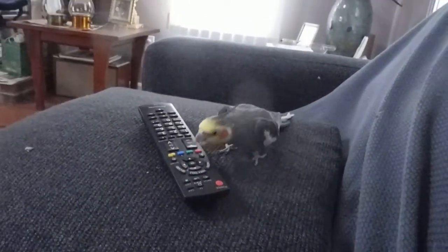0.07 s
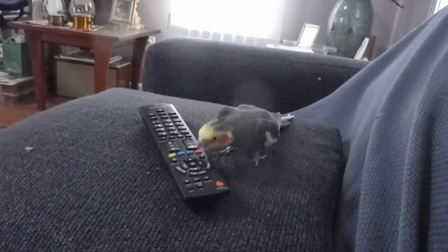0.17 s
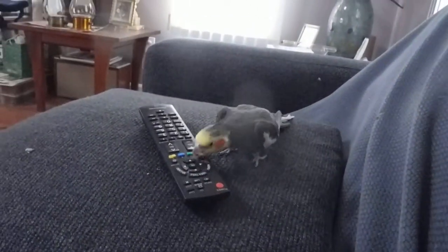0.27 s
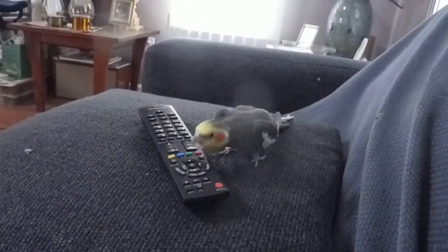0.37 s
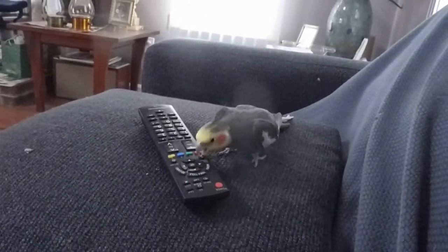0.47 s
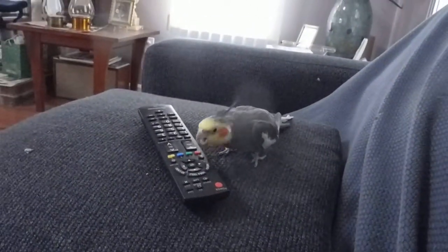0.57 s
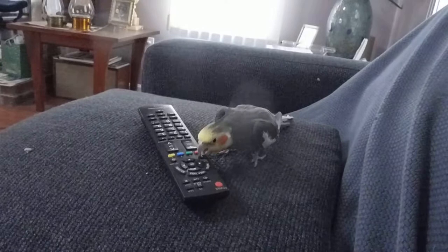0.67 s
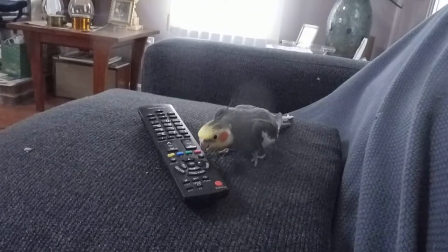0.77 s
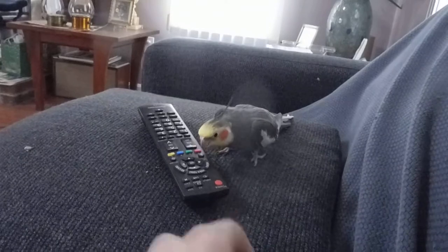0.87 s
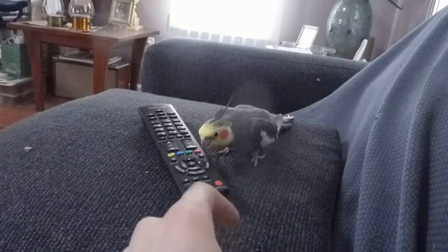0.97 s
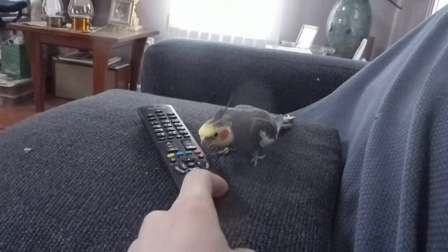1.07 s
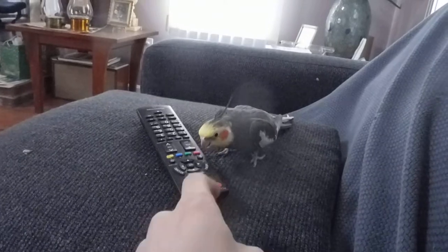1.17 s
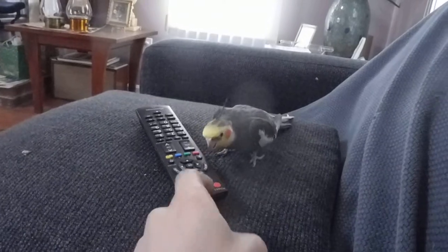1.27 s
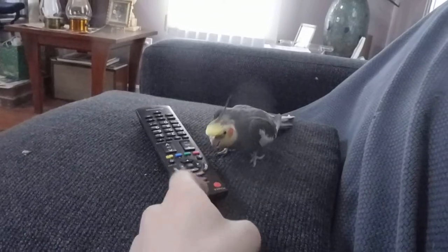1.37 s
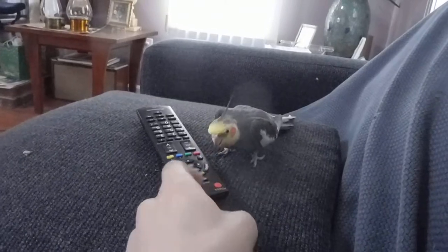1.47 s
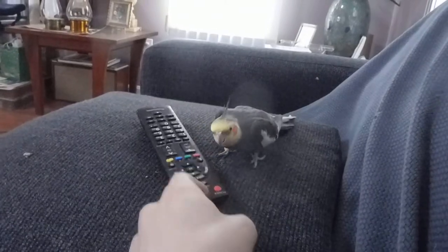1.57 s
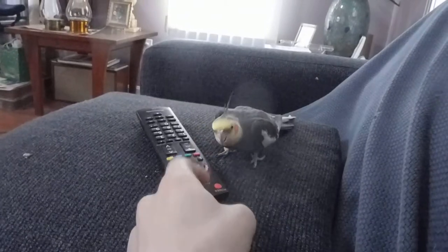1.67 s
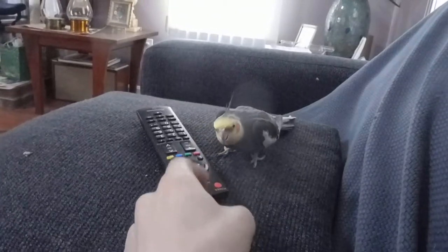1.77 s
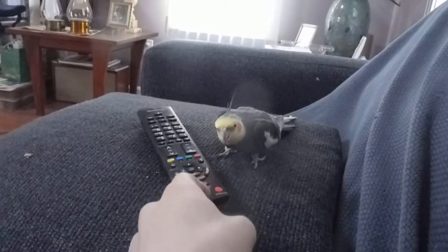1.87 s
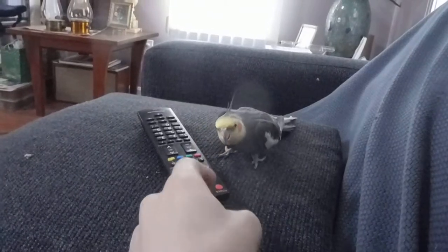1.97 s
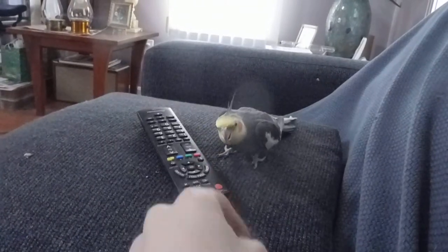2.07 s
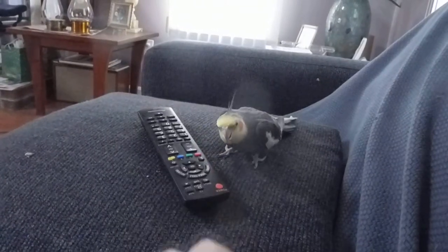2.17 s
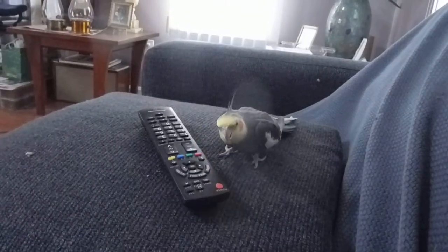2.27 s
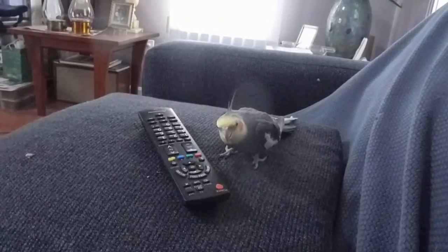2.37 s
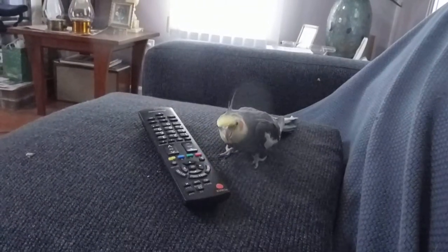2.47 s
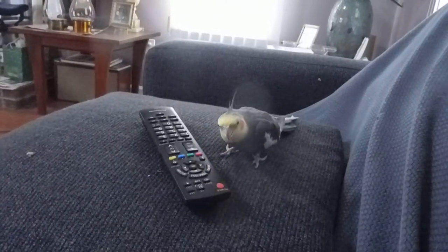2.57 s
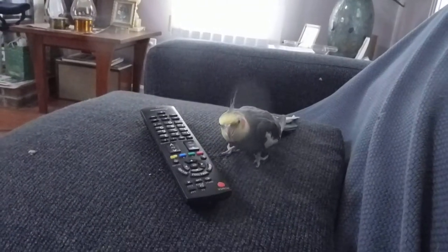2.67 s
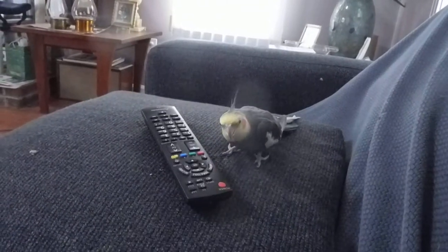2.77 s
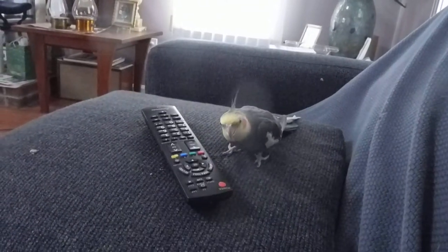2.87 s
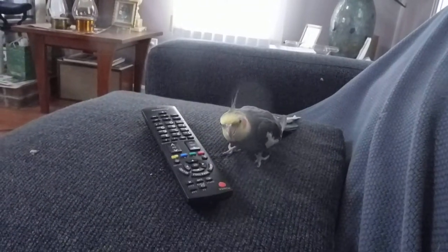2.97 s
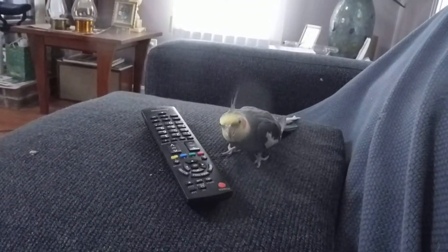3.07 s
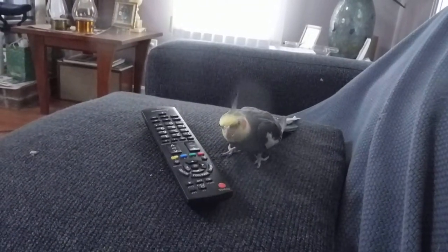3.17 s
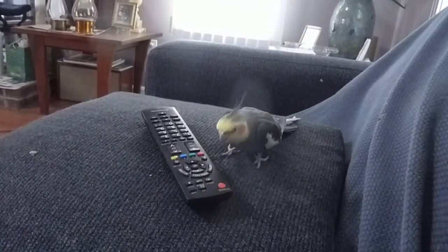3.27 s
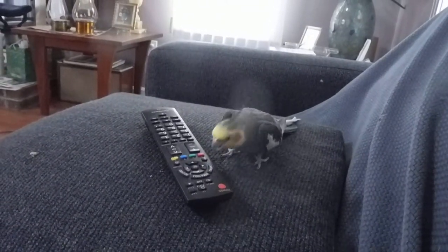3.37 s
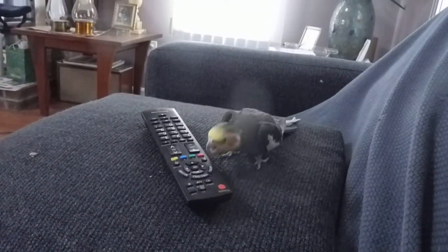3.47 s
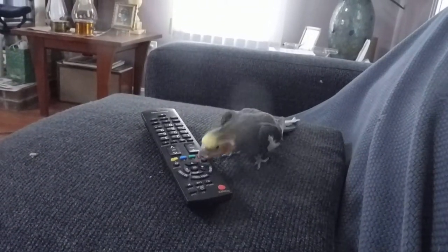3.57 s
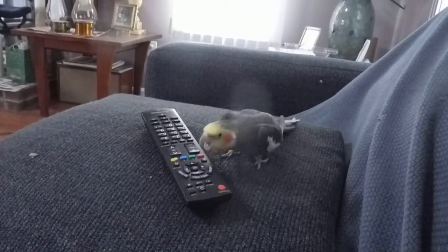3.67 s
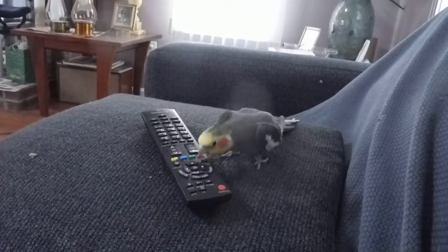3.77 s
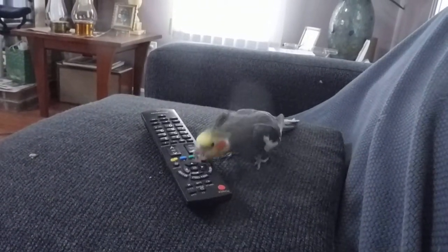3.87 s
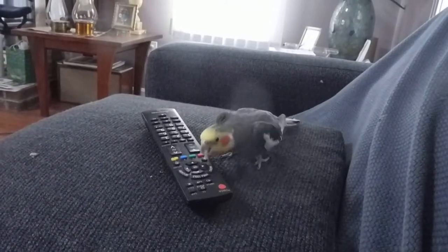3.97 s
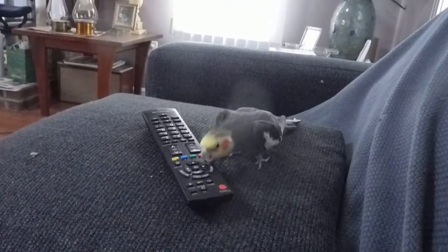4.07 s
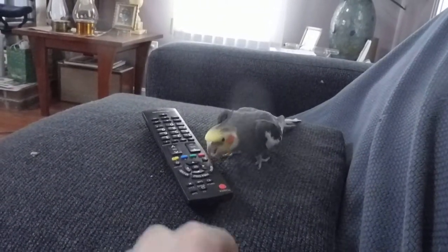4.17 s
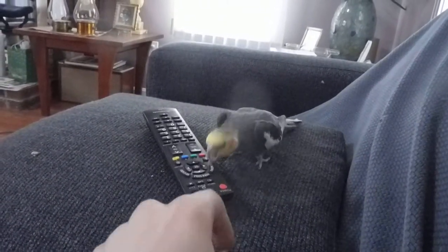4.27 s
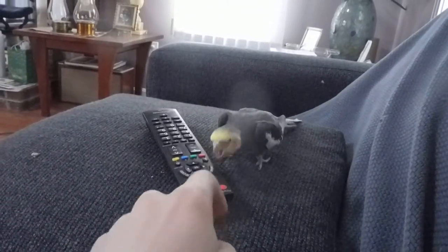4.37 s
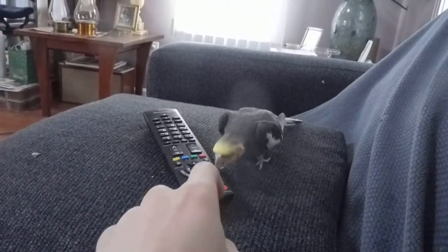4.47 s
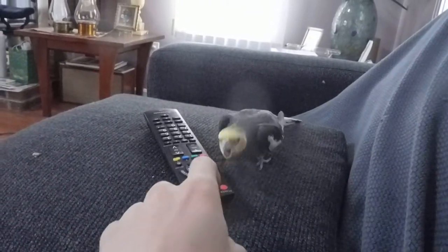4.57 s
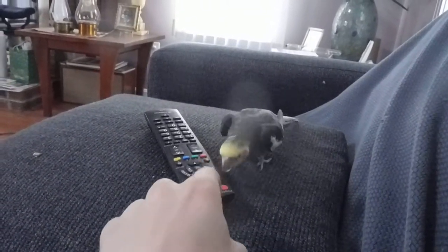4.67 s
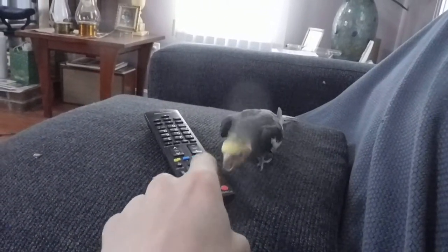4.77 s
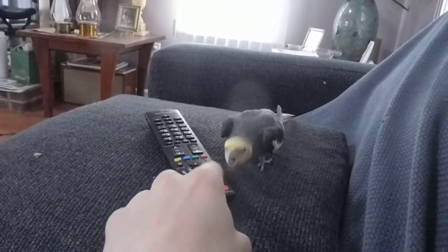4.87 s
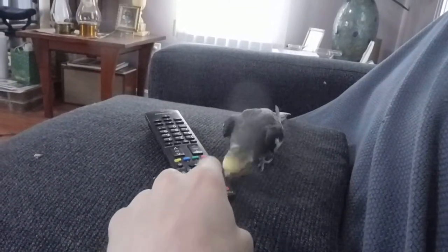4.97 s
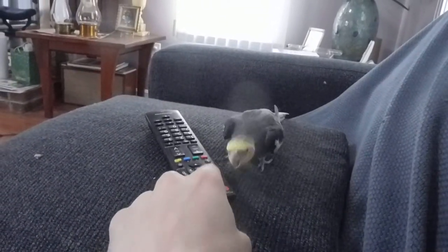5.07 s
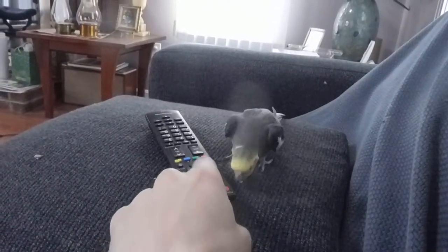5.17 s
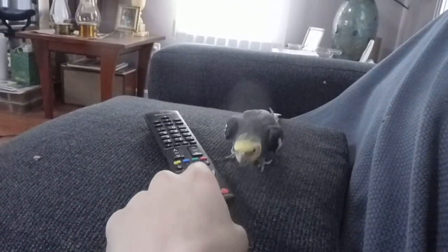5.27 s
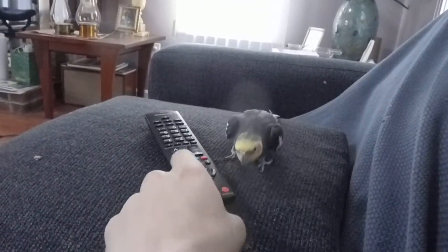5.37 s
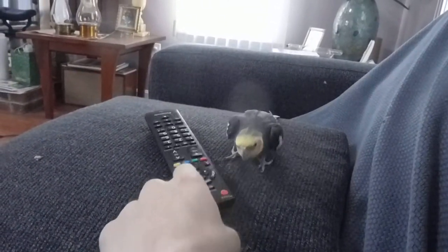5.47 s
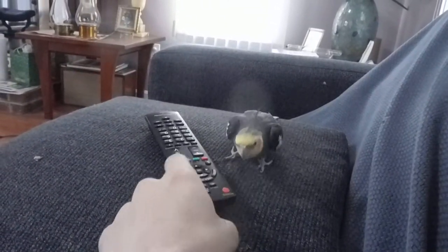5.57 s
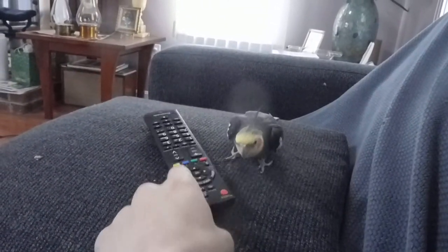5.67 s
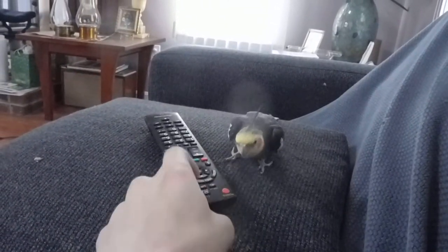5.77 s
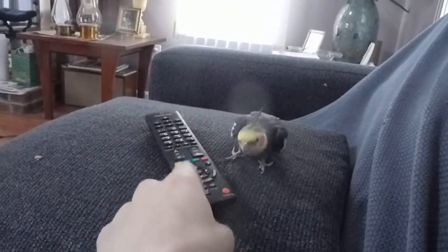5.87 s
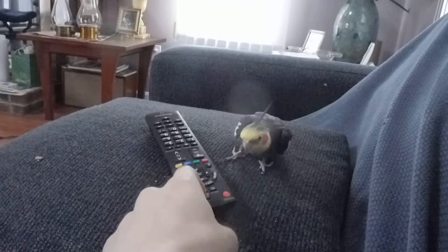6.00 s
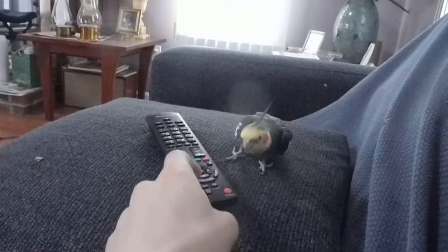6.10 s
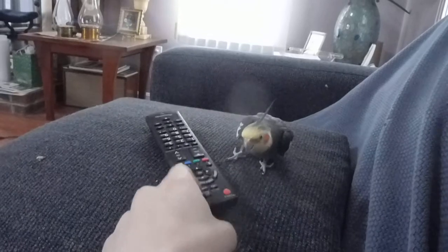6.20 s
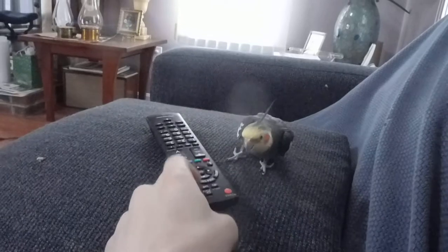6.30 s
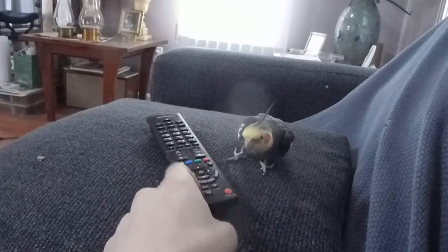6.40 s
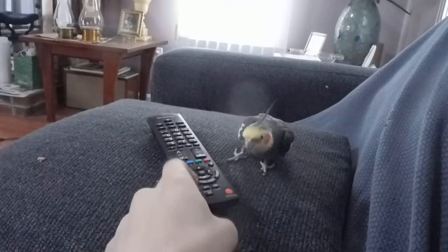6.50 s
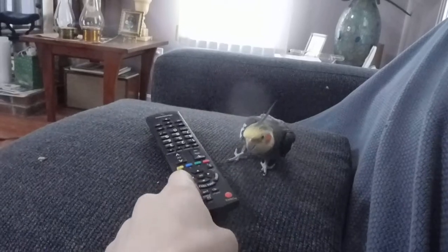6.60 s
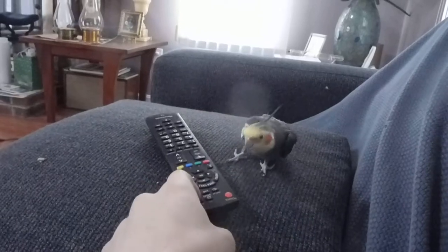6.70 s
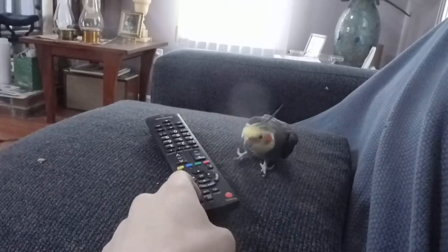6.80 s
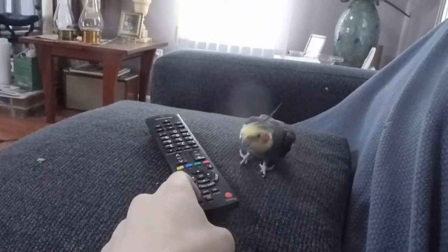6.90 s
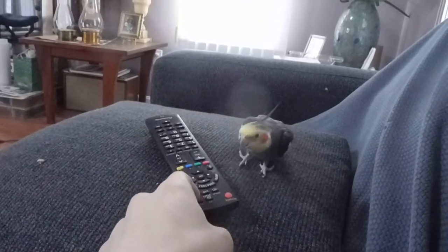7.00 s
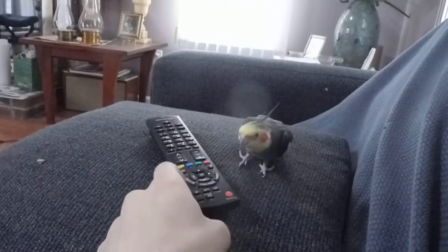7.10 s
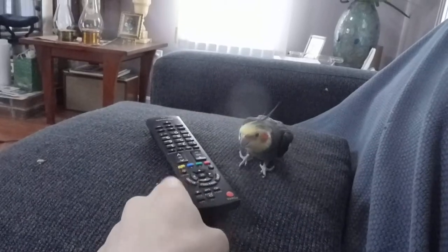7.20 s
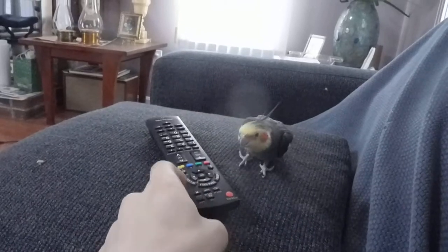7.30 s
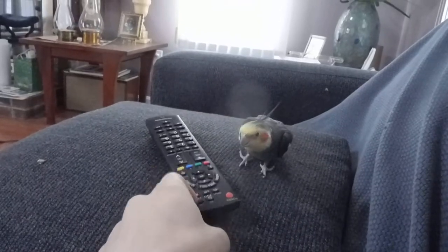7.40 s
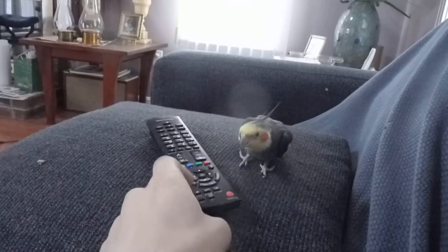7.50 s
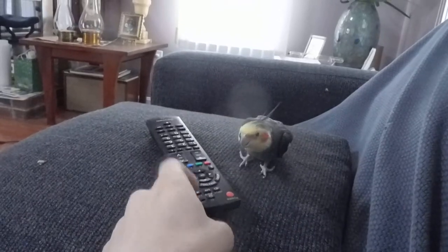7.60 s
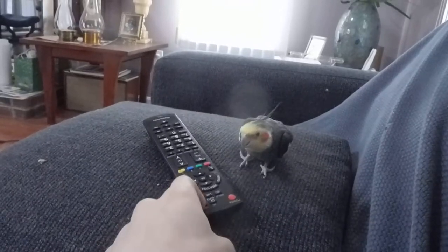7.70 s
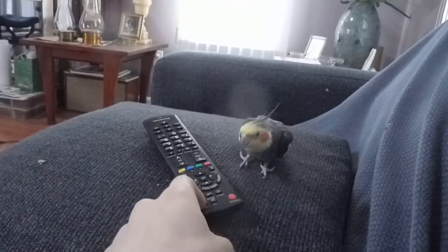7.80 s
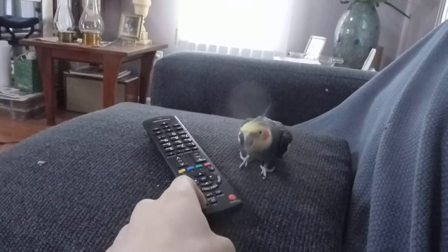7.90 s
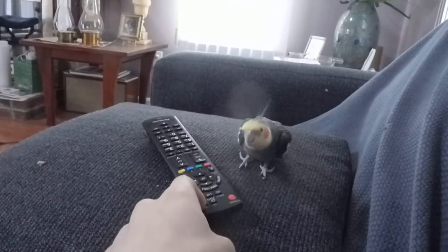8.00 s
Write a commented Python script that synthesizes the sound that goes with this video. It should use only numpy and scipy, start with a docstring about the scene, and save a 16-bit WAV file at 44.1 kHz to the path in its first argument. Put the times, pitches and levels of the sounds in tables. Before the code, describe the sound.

Tiny crisp beak clicks on plastic come in irregular clusters, answered by evenly spaced finger taps that rattle a hollow remote case. Midway there is a dull little thup and a run of sharp hard taps, fading in strength. More rattly button presses follow, then one brief bird squeak that breaks into a rasp. Close microphone, faint diffuse room tail, constant soft hiss over low rumble and hum.

```python
"""A quiet living room: steady hiss over a low rumble and an appliance's wavering hum, all the way through.
A pet bird's beak snaps at a plastic remote control, ringing modes and crackle, with a few noisy scrapes;
then a finger taps the buttons and rattles the hollow case. Midway come a soft downward "thup" and sharp taps
on hard plastic, then more button taps, and at the end one squeak: a falling whistle that breaks and rasps.
The room answers each of these faintly with a diffuse noise tail."""
import sys
import numpy as np
from scipy import signal
from scipy.fft import rfft, irfft
from scipy.io import wavfile
from scipy.ndimage import uniform_filter1d

SR = 44100
rng = np.random.default_rng(int(sys.argv[2]) if len(sys.argv) > 2 else 0)


def generate_wav(sig):
    """Save sig (samples, or channels by samples) to the path in sys.argv[1] as 16-bit PCM at SR."""
    pcm = np.round(np.clip(np.atleast_2d(sig).T, -1, 1) * 32767).astype(np.int16)
    wavfile.write(sys.argv[1], SR, pcm)


N = 354784
HIT_SIZE = 4096  # samples in one hit or scrape


def undb(db):
    """Decibels to gain."""
    return 10 ** (np.asarray(db) / 20)


def unit(x):
    """Scale to rms 1."""
    return x / np.sqrt(np.mean(x ** 2))


def read(points, hz):
    """Read a curve of (f/Hz, level/dB) points on a log-frequency axis."""
    at, db = np.transpose(points)
    return np.interp(np.log(np.maximum(hz, 1)), np.log(at), db)


def colour(x, points, share=1):
    """Minimum-phase EQ with the gain of (f/Hz, level/dB) points; share scales the dB."""
    size = x.shape[-1]
    gain_db = read(points, np.fft.rfftfreq(size, 1 / SR))
    cepstrum = irfft(share * np.log(undb(gain_db)), size)
    # fold the cepstrum forward in time, which makes the filter causal
    cepstrum[1:size // 2] *= 2
    cepstrum[size // 2 + 1:] = 0
    return irfft(rfft(x) * np.exp(rfft(cepstrum)), size)


def fade(t, t60):
    """Exponential decay from t = 0, falling 60 dB in t60 seconds."""
    return (t >= 0) * np.exp(-np.log(1000) * np.maximum(t, 0) / t60)


def swell(t, length, attack_s, release_s):
    """Rise, hold and die away within a given length."""
    rise = np.sqrt(np.clip(t / attack_s, 0, 1))
    return rise * np.clip((length - t) / release_s, 0, 1)


def add(track, s, sound):
    """Mix a sound in at a given time."""
    start = int(s * SR)
    track[start:start + len(sound)] += sound[:N - start]


# colour of the hiss and rumble, relative: f/Hz, level/dB
AIR_COLOUR = [(12, -46), (20, -6), (93, -1), (119, -6), (145, -8), (227, -10), (496, -11.5), (754, -11),
              (1110, -13.5), (1210, -13), (1320, -14), (2430, -16.5), (7230, -25), (14100, -26.5),
              (15800, -28)]
# stereo width, side relative to mid: f/Hz, level/dB
AIR_WIDTH = [(60, -13), (110, -8.5), (200, -4), (380, -2.5), (700, -2), (1290, -0.5), (2380, -0.5),
             (4400, 0.5), (8120, -0.5), (15000, 1)]
# lines of the appliance hum: f/Hz, level/dB
HUM_LINES = [(118.4, -67.5), (236.9, -78), (1184, -73.5), (13668, -88)]
AIR_DB = -55  # rms of the mid signal


def background(waver_hz=0.79):
    """Wide coloured noise makes hiss over rumble; slowly wandering sines, equal on both sides, make the hum."""
    mid, side = colour(rng.standard_normal((2, N)), AIR_COLOUR)
    gain = undb(AIR_DB) / np.std(mid)
    side = colour(side, AIR_WIDTH)
    hum = 0
    for hz, db in HUM_LINES:
        drift = waver_hz * unit(uniform_filter1d(rng.standard_normal(N), size=4000))
        phase = 2 * np.pi * np.cumsum(hz + drift) / SR
        hum = hum + np.sqrt(2) * undb(db) * np.sin(phase)
    return gain * np.array([mid + side, mid - side]) + hum


# edges of the five registers whose levels shape a hit: f/Hz
REGISTER_EDGES = [150, 700, 1250, 2500, 6500, 16000]
# colour of the fine crackle in every contact: f/Hz, level/dB
GRIT_COLOUR = [(200, -27), (600, -2), (1300, -5.5), (3500, 7.5), (6500, 5.5), (11000, 0.5), (15500, -8)]
# a small body radiates little bass and has a gap above its bending modes: f/Hz, level/dB
BODY_RADIATION = [(80, -20), (170, -6), (230, 1), (520, 0), (640, -8), (900, 0)]


def strike(contacts, modes, register_db, grit_db, grit_t60, scatter):
    """Contacts (t/ms, level/dB) ring decaying modes and crackle; the spot hit sets each register's strength."""
    hz, db, t60 = np.transpose(modes)[:, :, None]
    hz = hz * (1 + scatter * rng.standard_normal(hz.shape))
    # neighbouring bending modes swing against each other
    facing = np.where(hz < 700, (-1) ** np.arange(len(hz))[:, None], 1)
    sound = 0
    for ms, contact_db in contacts:
        t = np.arange(HIT_SIZE) / SR - ms / 1000
        drive = facing
        if ms:
            # a later contact is too light to bend the whole body; short waves meet it with either sign
            drive = np.where(hz > 2500, rng.choice([-1, 1], hz.shape), hz > 700)
        partials = drive * undb(db) * fade(t, t60) * np.sin(2 * np.pi * hz * t)
        ring = partials.sum(0)
        crackle = fade(t, grit_t60) * rng.standard_normal(HIT_SIZE)
        grit = undb(grit_db) * colour(crackle, GRIT_COLOUR)
        sound = sound + undb(contact_db) * (ring + grit)
    sound = colour(sound, BODY_RADIATION)
    # tilt the sound in four passes towards each register's share of the blow
    edges = np.array(REGISTER_EDGES)
    centres = np.sqrt(edges[1:] * edges[:-1])
    for _ in range(4):
        power = np.add.reduceat(abs(rfft(sound)) ** 2, edges * HIT_SIZE // SR)[:-1]
        now_db = 10 * np.log10(2 * power / HIT_SIZE / (.01 * SR))  # energy spread over 10 ms
        sound = colour(sound, np.column_stack([centres, register_db - now_db]))
    return sound


def all_round(hit):
    """What a hit radiates into the room: summed over all directions, its peaks and notches even out."""
    power = abs(rfft(hit)) ** 2
    hz = np.geomspace(60, 18000, num=200)
    smooth = uniform_filter1d(np.interp(hz, np.fft.rfftfreq(HIT_SIZE, 1 / SR), power), size=13)
    smooth_db = 10 * np.log10(np.maximum(smooth, 1e-12))
    return colour(signal.unit_impulse(HIT_SIZE), np.column_stack([hz, smooth_db]))


def double_clicks(clicks, modes, tone, grit_db, grit_t60, room_db, room_slope):
    """A hard tip hits and catches again a moment later; returns the direct sound and the room send."""
    direct, sent = np.zeros((2, N))
    tone_db, slope = np.transpose(tone)
    for s, db, contact_db, catch_ms, catch_db in clicks:
        register_db = db + tone_db + slope * contact_db
        contacts = [(0, 0), (catch_ms, catch_db)]
        click = strike(contacts, modes, register_db, grit_db, grit_t60, scatter=.012)
        add(direct, s, click)
        add(sent, s, all_round(click) * undb(room_db + room_slope * contact_db))
    return np.array([direct, sent])


# beak snaps: t/s, strength level/dB, hardness of the contact level/dB, second catch after t/ms, its level/dB
SNAPS = [(0.121,-34,7.5,1.34,-10), (0.1462,-46,-1,1.1,-2), (0.262,-50,-10,1.5,-10),
         (0.2859,-44.5,-0.5,1.5,-15), (0.4108,-50.5,-16,1.5,-18), (0.6226,-47,-4,1.25,0),
         (0.6455,-56.5,11,1.9,-18), (2.3557,-54,-17,1.2,-1), (3.4348,-36.5,7,1.3,-5), (3.4428,-52,9,1.1,-4),
         (3.5871,-33.5,9,1.9,8), (3.7286,-44.5,-4,1.28,-2), (3.8934,-46.5,-5.5,1.2,0),
         (4.078,-49.5,-14,1.3,-7), (4.099,-43,9.5,1.25,2), (5.0722,-63,9.5,1.15,-7)]
# what a snap rings with: f/Hz, level/dB, decay t60/s
SNAP_MODES = [(427, -4.5, 0.068), (1230, 6, 0.014), (1530, 2.5, 0.0076), (1980, -10, 0.019),
              (3030, 3, 0.0043), (3390, -4.5, 0.0064), (3950, 3, 0.0046), (5340, 4, 0.0031),
              (8750, -8.5, 0.0041), (9900, -1, 0.0026)]
# tone of a snap, one row per register; hardness lifts the treble: level/dB, dB gained per dB of hardness
SNAP_TONE = [(-14.5, -0.26), (-10.5, -0.1), (0.05, 0.18), (-4.5, 1.19), (-13.5, 1.06)]


def beak_snaps():
    """Short modes with little crackle; the harder the snap, the smaller the share of it sent to the room."""
    return double_clicks(SNAPS, SNAP_MODES, SNAP_TONE, grit_db=-6.5, grit_t60=0.008,
                         room_db=-13, room_slope=-.25)


# colour of the room's answer: f/Hz, level/dB
ROOM_COLOUR = [(150, 5), (500, 4), (1500, 7.5), (4500, 3.5), (8000, 1.5), (15000, 1)]


def room(x, t60=0.52, build_s=0.003, wall_s=0.023, wall_db=-4, wall_width_s=0.0013):
    """A diffuse noise tail builds up, with a cluster of reflections from the nearest walls."""
    t = np.arange(SR // 2) / SR
    tail = np.minimum(t / build_s, 1) * fade(t, t60)
    walls = undb(wall_db) * np.exp(-((t - wall_s) / wall_width_s) ** 2)
    shape = tail + walls
    response = shape * rng.standard_normal((2, len(t))) / np.sqrt(np.sum(shape ** 2))
    return signal.fftconvolve(x[None], colour(response, ROOM_COLOUR), axes=1)[:, :N]


# dry scrapes on the plastic: t/s, length t/s, level/dB
SCRAPE_TIMES = [(0.285, 0.015, -45.5), (1.404, .014, -52.5), (1.423, .012, -58), (1.44, 0.014, -55),
                (2.301, 0.074, -61.5), (7.174, 0.04, -61)]
# colour of a scrape: f/Hz, level/dB
SLIDE_COLOUR = [(700, -35), (1500, 7), (3500, 12), (5500, 6.5), (7500, -7), (12000, -3), (15500, -26)]


def scrapes(room_db=-13):
    """Beak or skin slides over plastic: a short dense run of tiny slips."""
    track = np.zeros(N)
    t = np.arange(HIT_SIZE) / SR
    for s, length, db in SCRAPE_TIMES:
        # random strengths make some slips stand out
        slips = rng.standard_normal(HIT_SIZE) * undb(1.2 * rng.exponential(size=HIT_SIZE))
        arch = np.sqrt(np.clip(4 * t / length * (1 - t / length), 0, 1))
        add(track, s, undb(db) * arch * unit(colour(slips, SLIDE_COLOUR)))
    return np.array([track, track * undb(room_db)])


# finger taps: t/s, strength level/dB, squareness of the press level/dB, hardness level/dB, rebound level/dB
FINGER_TAPS = [(1.3897,-52.5,1.5,3,0), (1.555,-44,3.5,0,-3), (1.7207,-44,4,1,-4), (1.8715,-44,4,-0.5,-1),
               (5.822,-50,-3.5,-3,-1), (5.9902,-61,-3,0,0), (6.1659,-43.5,-1.5,-3.5,3),
               (6.347,-59,-6,-4,-5), (6.546,-41,-2.5,0,2), (7.381,-43,.4,-1.5,-1),
               (7.6483,-37.5,-3.5,4.5,-2.5)]
# the hollow case of the remote: f/Hz, level/dB, decay t60/s
HOLLOW_CASE = [(256.5, 1.5, 0.088), (397, 6.5, 0.027), (446, 4.5, 0.038), (539, -6, 0.073),
               (1010, -20, 0.049), (1250, -16, 0.015), (1420, -10.5, 0.008), (1850, -13, 0.033),
               (2107, -5.5, 0.036), (2910, -8.5, 0.045), (3270, 3, 0.029), (3640, -2, 0.045),
               (4300, -5, 0.017), (5850, 3, 0.02), (7300, 2, 0.011)]
# loose parts of the case knock again this long after a tap: t/ms
RATTLE_DELAYS = [2.75, 6.8]
# tone of a tap, one row per register: level/dB, dB gained per dB of squareness
# (a square press thumps and clicks, a glancing one knocks)
PRESS_TONE = [(-0.9, 0.97), (-5.5, -0.1), (-.5, -0.46), (3, 0.35), (-6.5, 0.3)]
# share of the hardness that reaches each register: factor
HARDNESS_SHARE = [0.037, 0, 0.19, 0.55, 1]


def finger_taps(grit_db=9, grit_t60=0.019, rebound_loss_db=3.0, bend_db=3, bend_slope=1.9, room_db=-12):
    """A tap on a button knocks the hollow case, whose loose parts rebound twice."""
    direct, sent = np.zeros((2, N))
    tone_db, slope = np.transpose(PRESS_TONE)
    for s, db, square_db, hard_db, rebound_db in FINGER_TAPS:
        rebounds = zip(RATTLE_DELAYS, (rebound_db, rebound_db - rebound_loss_db))
        contacts = [(0, 0), *rebounds]
        modes = np.array(HOLLOW_CASE, float)
        modes[0, 1] += bend_db - bend_slope * square_db  # a glancing press bends the case more
        register_db = db + tone_db + slope * square_db + hard_db * np.array(HARDNESS_SHARE)
        tap = strike(contacts, modes, register_db, grit_db, grit_t60, scatter=0.021)
        add(direct, s, tap)
        add(sent, s, all_round(tap) * undb(room_db))
    return np.array([direct, sent])


# the thup: start, length, level that its growth heads for; start pitch, its fall, and where it settles
THUP_S, THUP_LENGTH_S, THUP_DB = 4.002, 0.022, -35
THUP_HZ, THUP_FALL_HZ_PER_S, THUP_LOW_HZ = 1392, 71000, 150


def thup(rise_db_per_s=900, attack_s=0.0026, release_s=0.0022, scuff_db=-52, room_db=-18):
    """One quick dull downward sweep that grows as it sinks, wrapped in a light noise scuff."""
    t = np.arange(int(THUP_LENGTH_S * SR)) / SR
    hz = np.maximum(THUP_HZ - THUP_FALL_HZ_PER_S * t, THUP_LOW_HZ)
    growth = undb(THUP_DB - rise_db_per_s * (THUP_LENGTH_S - t))
    sweep = np.sqrt(2) * growth * np.sin(2 * np.pi * np.cumsum(hz) / SR)
    scuff = unit(np.convolve(rng.standard_normal(len(t)), np.hanning(20), "same"))
    envelope = swell(t, THUP_LENGTH_S, attack_s, release_s)
    track = np.zeros(N)
    add(track, THUP_S, envelope * (sweep + undb(scuff_db) * scuff))
    return np.array([track, track * undb(room_db)])


# sharp taps on hard plastic: t/s, strength level/dB, body moved level/dB, second catch after t/ms, its level/dB
PLASTIC_TAPS = [(4.2968,-34.3,-11.5,.95,-7.5), (4.4706,-35.5,0,1.2,-9.5), (4.6341,-40,4.5,1.16,-13),
                (4.8046,-45.6,7,1.25,-2)]
# what the plastic rings with under a sharp tap: f/Hz, level/dB, decay t60/s
PLASTIC_RING = [(303, -6.5, 0.051), (393, -4.5, 0.059), (900, -15, 0.025), (1296, 1.5, 0.017),
                (1710, -9, 0.012), (2046, 0.5, 0.012), (3100, -6, 0.012), (3590, 4.5, 0.0074),
                (4380, 10, 0.0051), (5140, 1, 0.01), (8430, 3, 0.0051), (10400, -3, 0.0052)]
# tone, one row per register; moving the body fills in the bass: level/dB, dB gained per dB of body
PLASTIC_TONE = [(-12.5, 1.25), (-6.5, 1), (-0.5, .5), (8, 0.03), (-2, -0.04)]


def plastic_taps():
    """Sharp, crackly hits; the more a tap moves the body, the larger the share of it sent to the room."""
    return double_clicks(PLASTIC_TAPS, PLASTIC_RING, PLASTIC_TONE, grit_db=4, grit_t60=0.0052,
                         room_db=-14, room_slope=0.19)


# colour of the squeak's overtones and rasp: f/Hz, level/dB
THROAT_COLOUR = [(2000, -8), (3000, -5.5), (3700, -3.5), (5000, -1), (6500, -1), (7500, -18), (9000, -32),
                 (15000, -34)]
SQUEAK_S, SQUEAK_LENGTH_S, SQUEAK_DB = 7.8915, 0.064, -37.5  # start, length, peak of the fundamental
SQUEAK_HZ, SQUEAK_FALL_OCT_PER_S = 1903, 12.3  # pitch at the start, and how fast it sinks
SQUEAK_BREAK_S, SQUEAK_BREAK_OCT = 0.0106, .08  # this long after its start it breaks and drops by a step


def squeak(attack_s=0.0092, release_s=0.037, bright_db=2.0, dulling_db_per_s=200, break_rough=.45,
           roughen_s=0.034, jitter=0.31, flutter=0.54, rasp_db=2, room_db=-14):
    """A falling whistle with bright overtones starts clean, then breaks: cycles grow uneven, upper ones rasp."""
    t = np.arange(int(SQUEAK_LENGTH_S * SR)) / SR
    broken = t > SQUEAK_BREAK_S
    hz = SQUEAK_HZ * 2 ** (-SQUEAK_FALL_OCT_PER_S * t - SQUEAK_BREAK_OCT * broken)
    rough = broken * np.clip(break_rough + (t - SQUEAK_BREAK_S) / roughen_s, 0, 1)
    # row 0 jitters the phase, the others flutter one overtone each
    wobble = unit(uniform_filter1d(rng.standard_normal((8, len(t))), size=40))
    phase = 2 * np.pi * np.cumsum(hz) / SR + jitter * rough * wobble[0]
    overtones = 0
    for k in range(2, 9):
        level = undb(read(THROAT_COLOUR, k * hz)) * (1 + flutter * rough * wobble[k - 1])
        overtones = overtones + level * np.sin(k * phase)
    # a puff of turbulence escapes once a cycle
    puffs = rng.standard_normal(len(t)) * (1 + np.sin(phase)) / 2
    rasp = undb(rasp_db) * rough * colour(puffs, THROAT_COLOUR)
    tone = np.sin(phase) + undb(bright_db - dulling_db_per_s * t) * (overtones + rasp)
    envelope = swell(t, SQUEAK_LENGTH_S, attack_s, release_s)
    track = np.zeros(N)
    add(track, SQUEAK_S, undb(SQUEAK_DB) * envelope * tone)
    return np.array([track, track * undb(room_db)])


# direct sound at the two microphones, left relative to right: f/Hz, level/dB
STEREO_BALANCE = [(300, -0.5), (1000, 0), (2000, -3), (4500, -5), (6500, -2.5), (8500, 1.5), (12000, 5.5)]


def scene():
    """All close sounds share one spot, mids leaning right and top treble left, plus room and background."""
    hits = beak_snaps() + finger_taps() + plastic_taps()
    direct, sent = hits + scrapes() + thup() + squeak()
    near = np.array([colour(direct, STEREO_BALANCE, ear / 2) for ear in (1, -1)])
    return near + room(sent) + background()


def record(dry):
    """The recorder cuts the top with a steep low-pass at 15.9 kHz."""
    return signal.sosfilt(signal.ellip(10, .1, 70, 15900, fs=SR, output="sos"), dry)


dry = scene()
out = record(dry)
generate_wav(out)
```